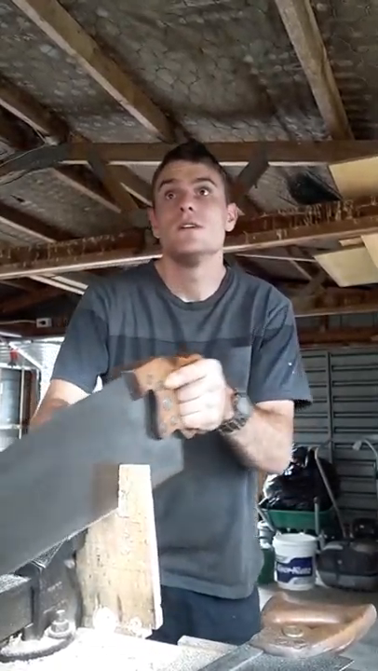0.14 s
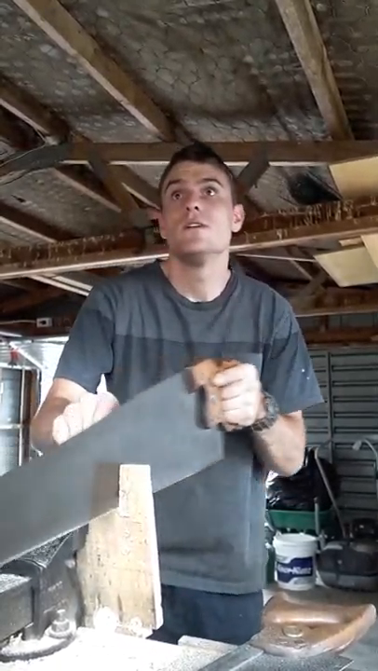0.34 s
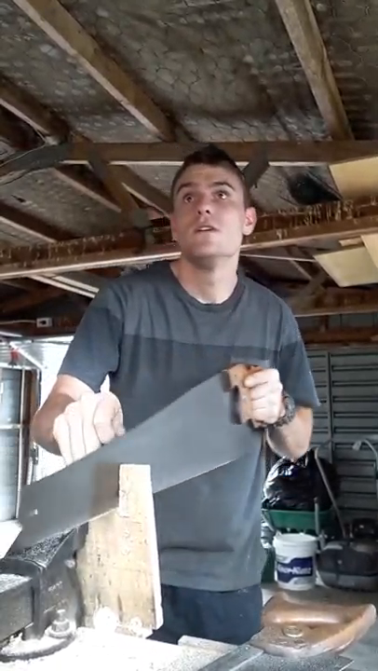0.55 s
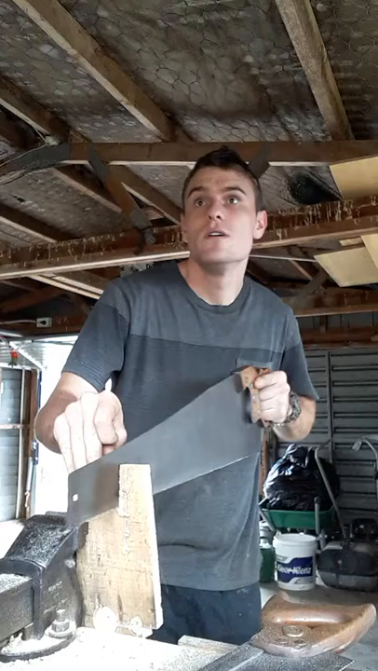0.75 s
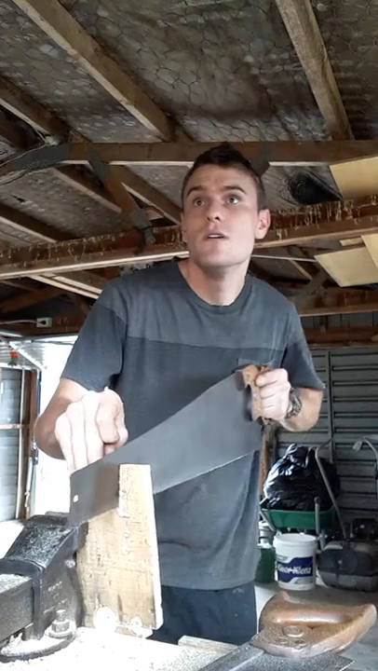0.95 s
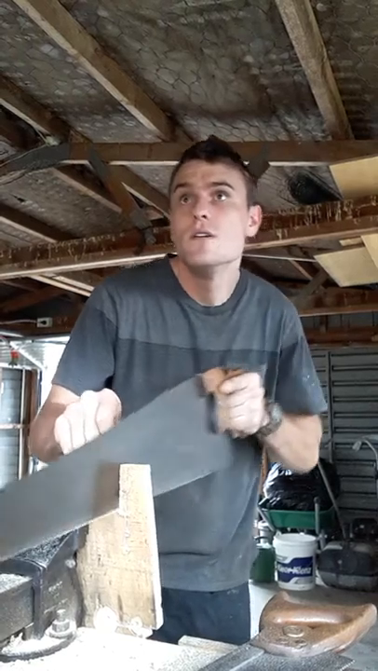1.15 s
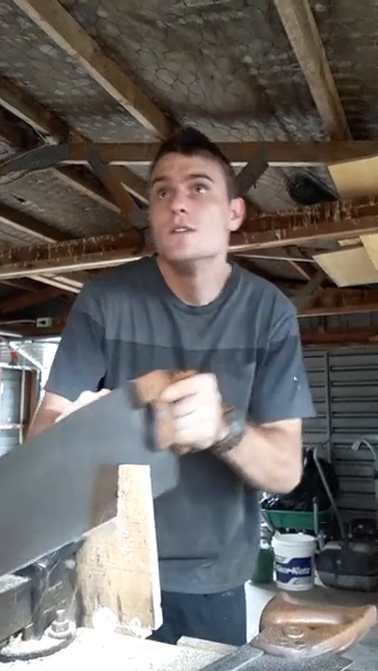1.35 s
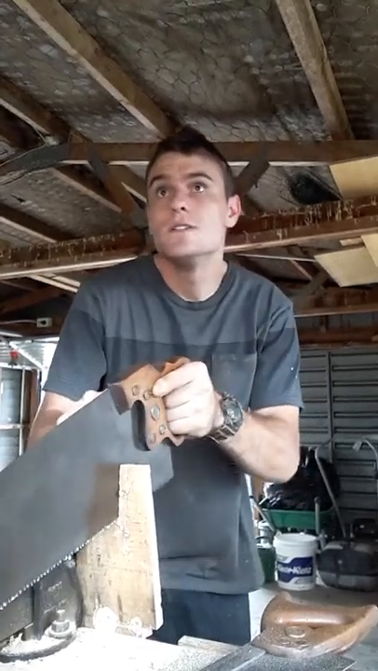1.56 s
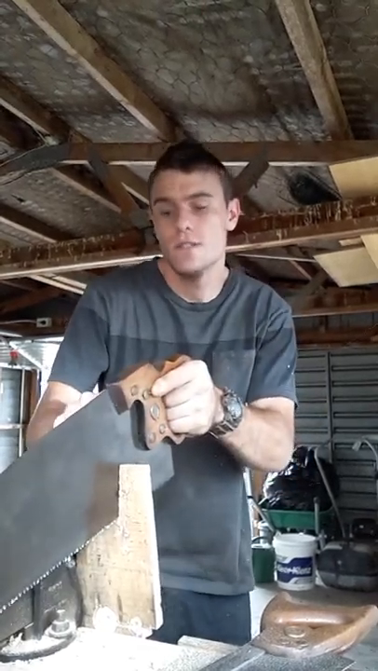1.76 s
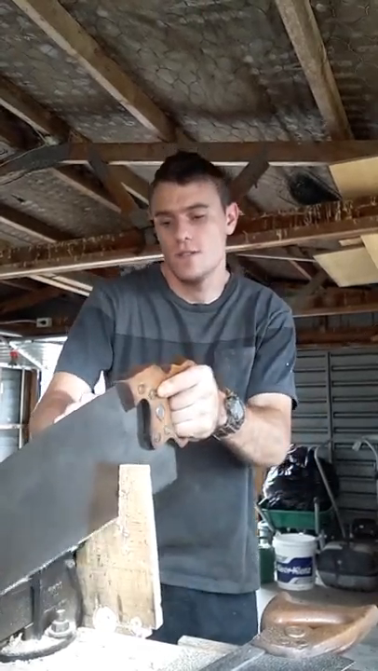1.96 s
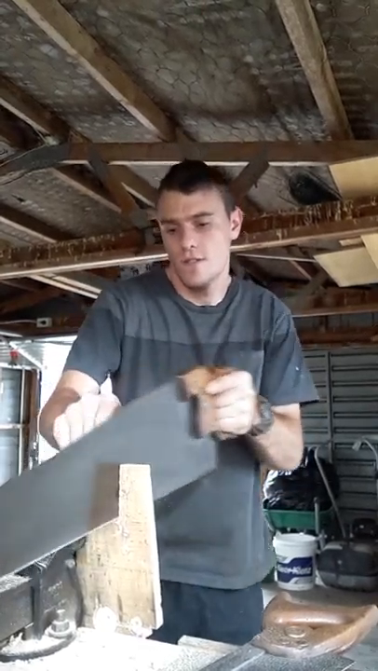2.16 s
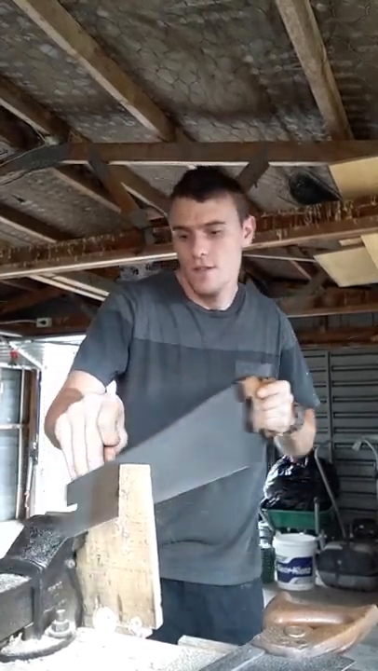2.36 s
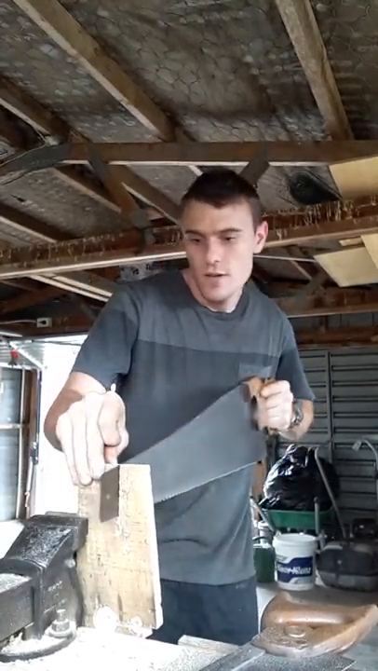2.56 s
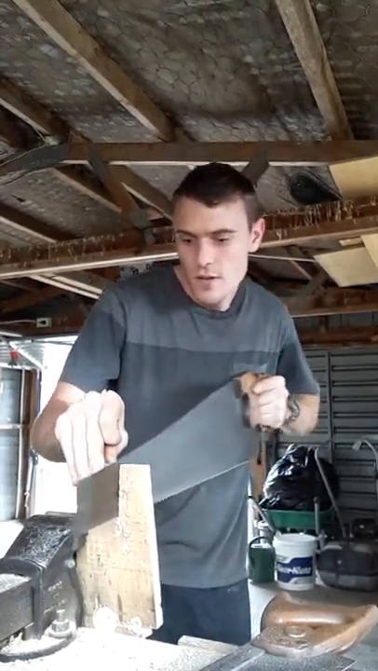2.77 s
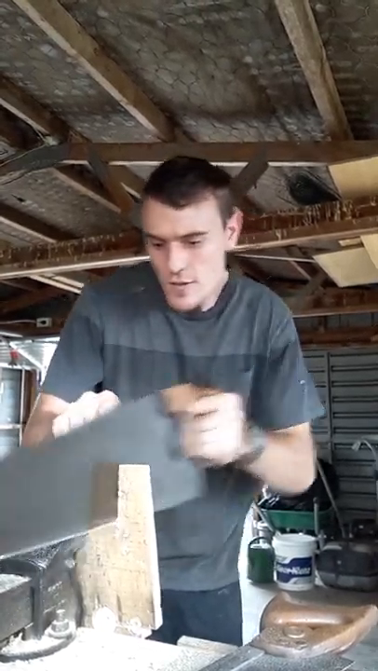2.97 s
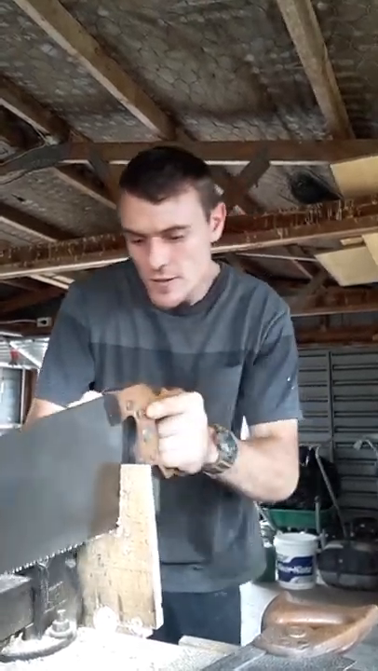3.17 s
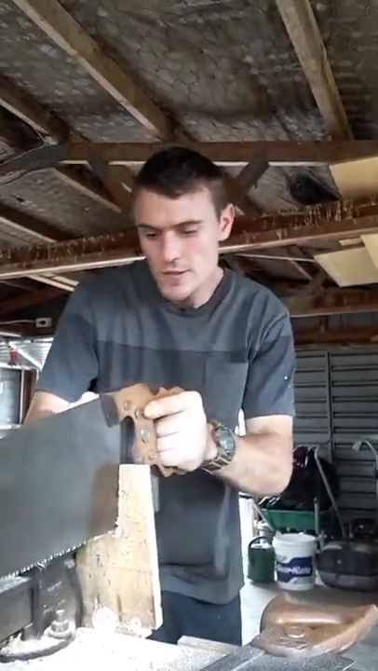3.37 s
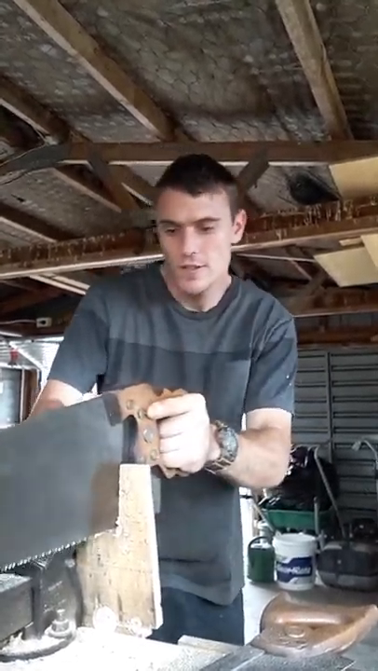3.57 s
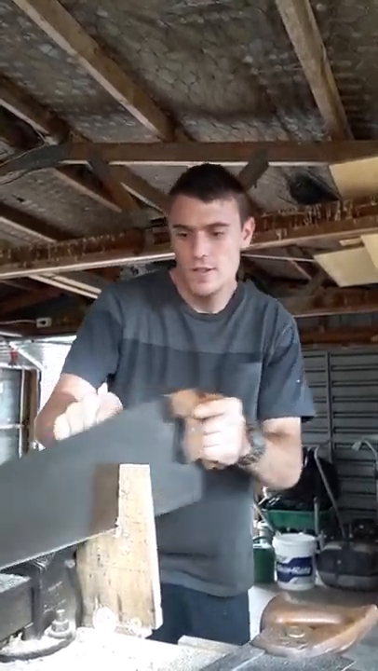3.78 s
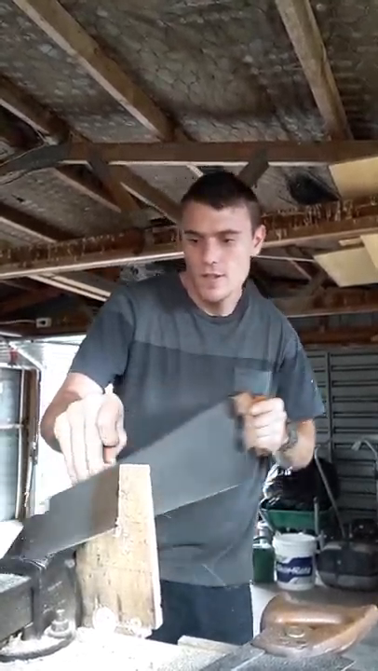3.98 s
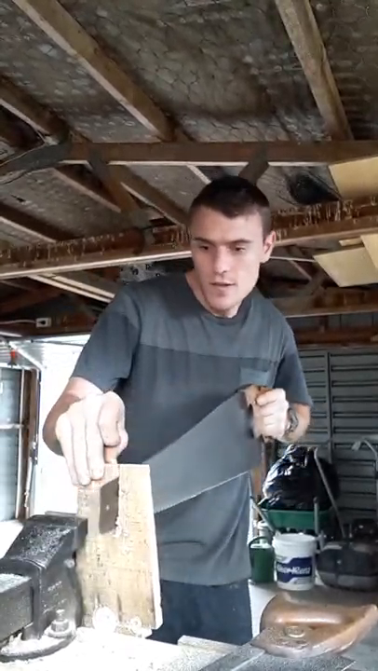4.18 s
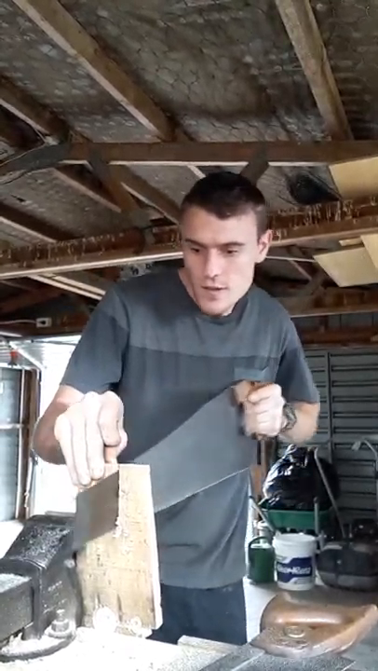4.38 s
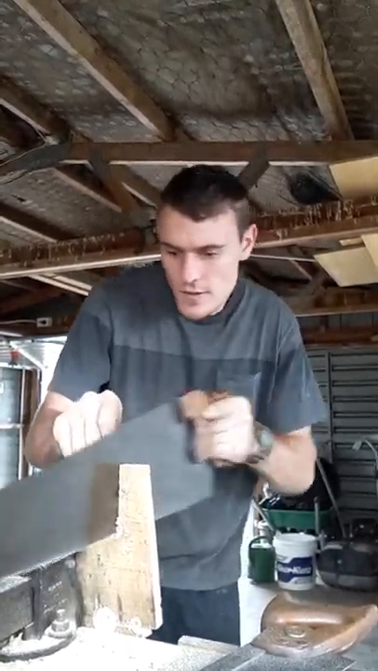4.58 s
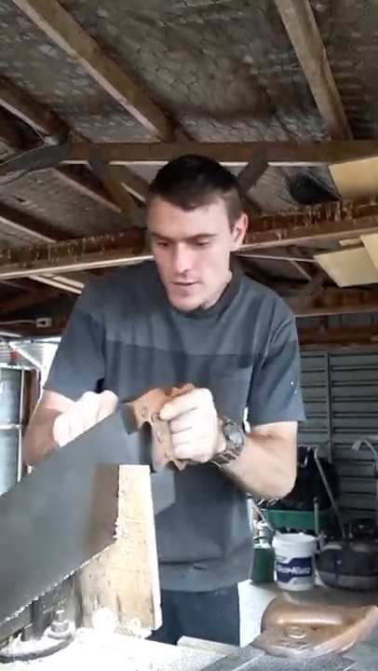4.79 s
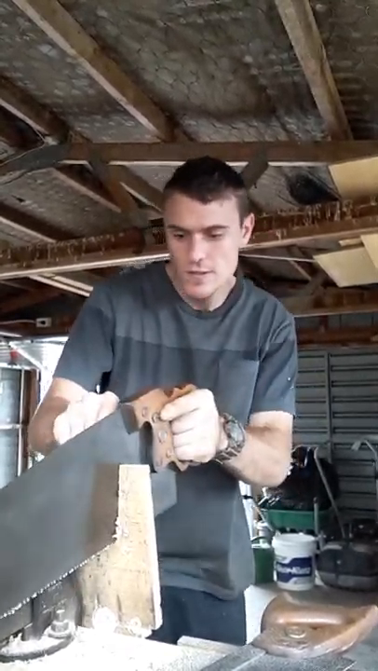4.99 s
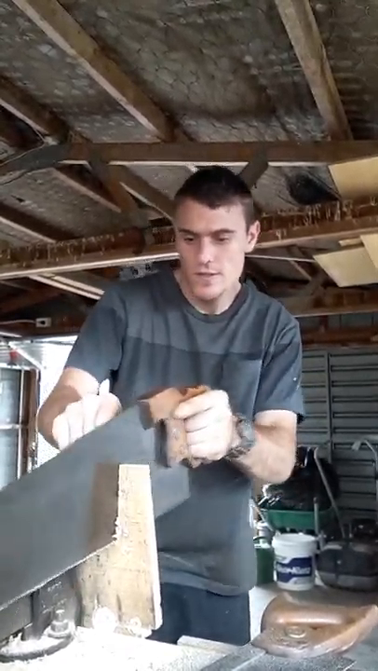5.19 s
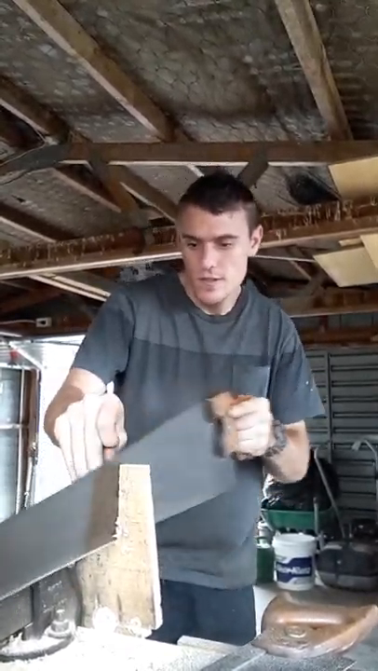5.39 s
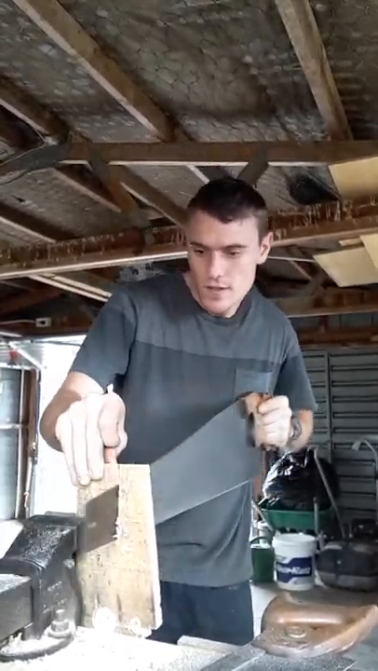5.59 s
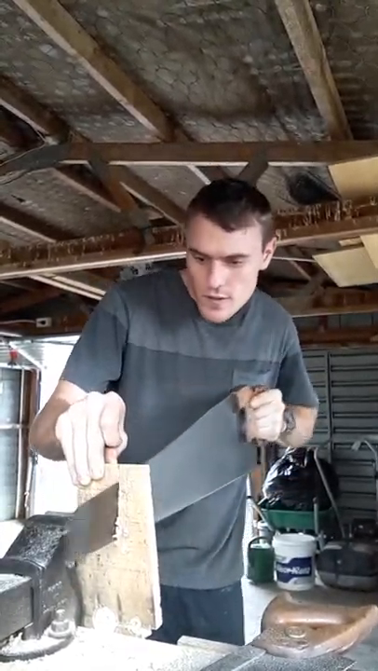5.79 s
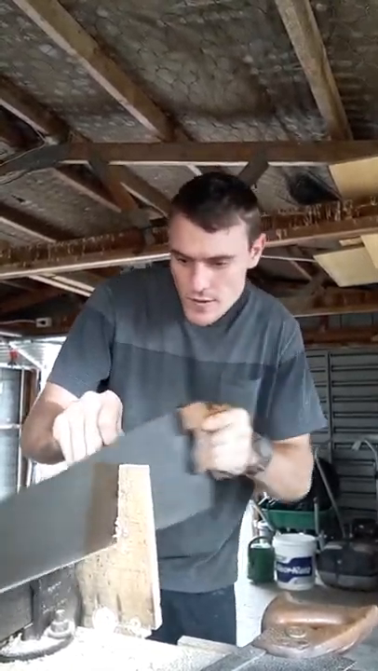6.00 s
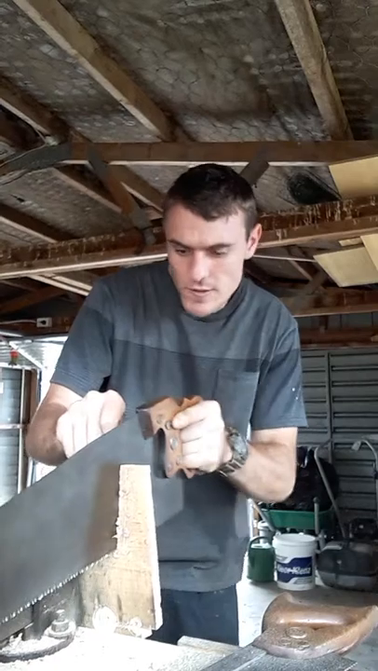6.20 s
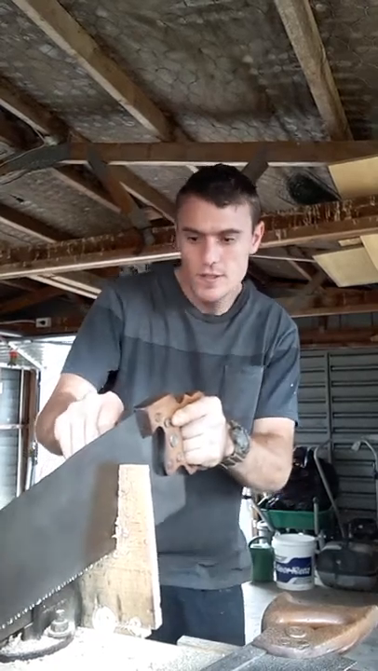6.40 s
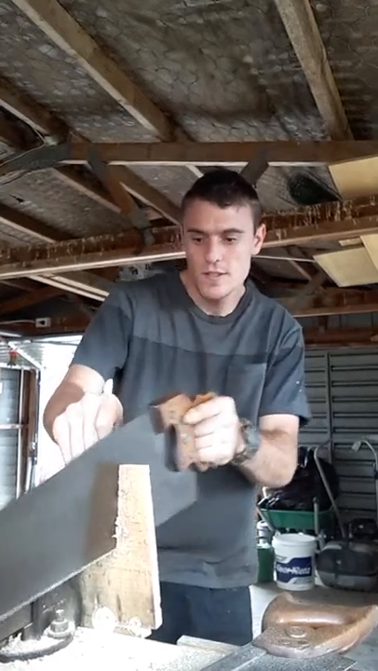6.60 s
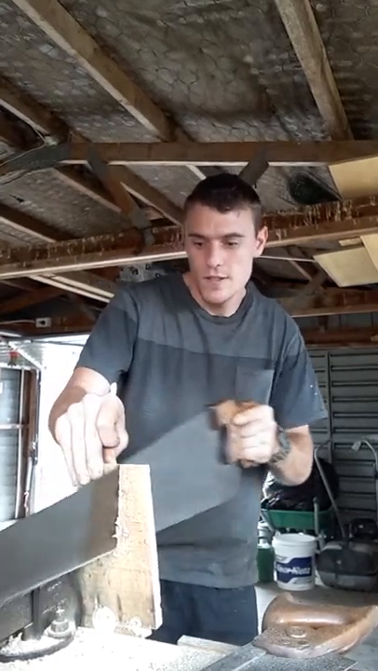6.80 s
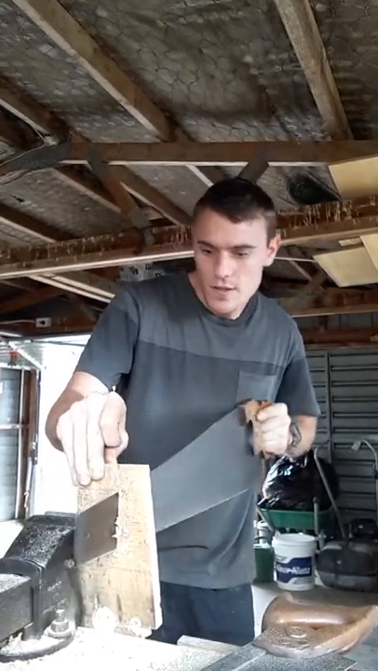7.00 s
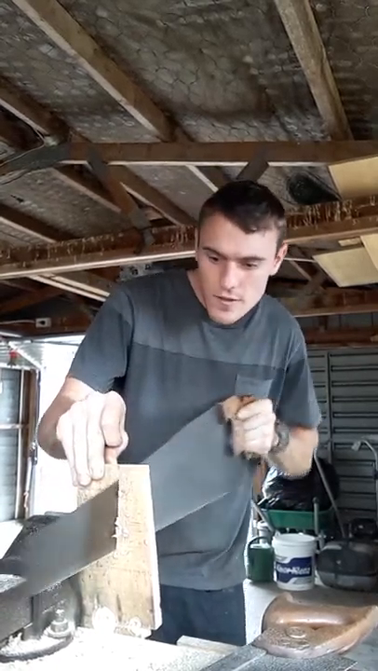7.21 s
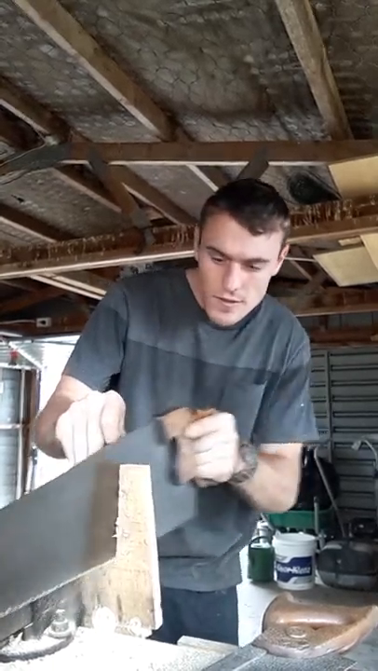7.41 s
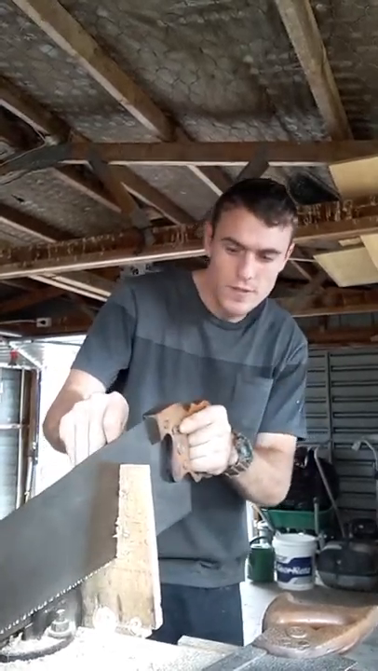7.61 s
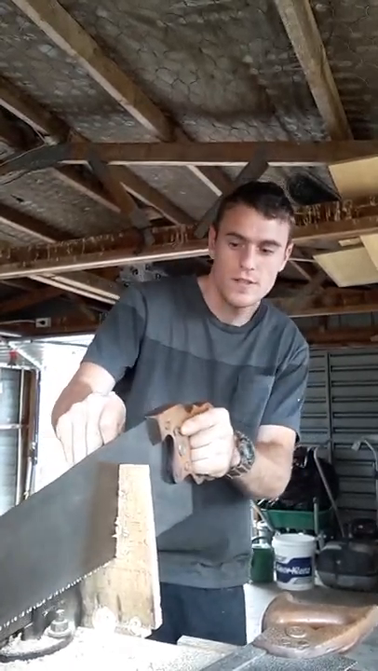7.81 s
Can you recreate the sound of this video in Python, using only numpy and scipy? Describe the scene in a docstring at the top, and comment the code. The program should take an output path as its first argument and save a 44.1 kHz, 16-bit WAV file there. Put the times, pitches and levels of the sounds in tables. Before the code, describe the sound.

Close view of a large hand saw ripping an upright board in a vice. Pulls and pushes alternate steadily, coarse fibrous rasps with a bright steely hiss, strongest on the pushes. The board hums low and the bench rumbles. Splinters snap as teeth catch, and the slack blade knocks woodenly between strokes. A short, dull workshop echo; the last push stops and two knocks follow over faint air.

```python
"""A large hand saw rips a board upright in a vice, in a timber-roofed workshop: five pulls, five pushes, in turn.
The first pull starts at once: torn fibres rasp and ring the steel, the board sways, the bench rumbles.
Teeth snag from early on, noise bursts as splinters snap; from 1.6 s the slack blade knocks in the kerf near
the turns, a steel tick and decaying sines. The second push rasps loudest; the board's twist flares at 6.9 s.
After the last push, near 7.5 s, two more knocks sound over faint air noise."""
import sys
import numpy as np
from scipy import signal
from scipy.fft import rfft, irfft, next_fast_len
from scipy.io import wavfile
from scipy.ndimage import uniform_filter1d

SR = 44100
rng = np.random.default_rng(int(sys.argv[2]) if len(sys.argv) > 2 else 0)


def log_audio(samples):
    """Write samples as a 16-bit WAV file to the path given in sys.argv[1]."""
    # one column per channel
    frames = np.atleast_2d(samples).T
    # limit to full scale, then quantise
    limited = np.clip(frames, -1, 1)
    pcm = np.round(limited * 32767).astype(np.int16)
    wavfile.write(sys.argv[1], SR, pcm)


N = 346185
T = np.arange(N) / SR


def from_db(db):
    """Decibels to gain."""
    return 10 ** (np.asarray(db) / 20)


def rms_one(x):
    """Scale to unit power."""
    return x / np.sqrt(np.mean(x ** 2) + 1e-20)


def steady(x, window_s):
    """Hold the power at 1 over spans longer than the window."""
    size = max(int(window_s * SR), 2)
    power = np.abs(uniform_filter1d(uniform_filter1d(x ** 2, size), size))
    return x / np.sqrt(power + 1e-12)


def colour(x, points):
    """Causal minimum-phase filter with the given (Hz, dB) spectrum, falling steeply past its ends."""
    size = next_fast_len(len(x) + SR // 4, real=True) * 2
    octave = np.log2(np.maximum(np.fft.rfftfreq(size, 1 / SR), 1))
    hz, db = np.transpose(points)
    beyond_octaves = np.abs(octave - np.clip(octave, np.log2(hz[0]), np.log2(hz[-1])))
    gain = from_db(np.interp(octave, np.log2(hz), db) - np.minimum(40 * beyond_octaves, 80))
    # folding the cepstrum onto positive time gives minimum phase
    cepstrum = irfft(np.log(gain))[:size // 2]
    cepstrum[1:] *= 2
    response = np.exp(rfft(cepstrum, size))
    return irfft(rfft(x, size) * response)[:len(x)]


def resonate(x, modes):
    """Parallel two-pole resonances of (Hz, width in Hz, gain at the top in dB)."""
    out = 0
    for hz, width_hz, db in modes:
        r = np.exp(-np.pi * width_hz / SR)
        poles = [1, -2 * r * np.cos(2 * np.pi * hz / SR), r * r]
        out = out + from_db(db) * (1 - r * r) / 2 * signal.lfilter([1, 0, -1], poles, x)
    return out


def ring(clicks, hz, t60_s):
    """A unit click sets a decaying sine of height 1 ringing."""
    r, w = from_db(-60 / (t60_s * SR)), 2 * np.pi * hz / SR
    return signal.lfilter([0, np.sin(w)], [1, -2 * r * np.cos(w), r * r], clicks + 1e-18)


def clicks_at(times_s, db):
    """One single-sample click for each time."""
    out = np.zeros(N)
    out[(np.asarray(times_s) * SR).astype(int)] = from_db(db)
    return out


def decay(clicks, decay_s):
    """Each click becomes an exponentially dying pulse."""
    return signal.lfilter([1], [1, -np.exp(-1 / (decay_s * SR))], clicks + 1e-18)


def crack(clicks, decay_s):
    """Each click becomes a quickly dying burst of noise."""
    return decay(clicks, decay_s) * rng.standard_normal(N)


def drift(per_s):
    """A random wander: straight lines between normal draws, per_s draws a second."""
    knots = rng.standard_normal(4000)
    return np.interp(T * per_s, np.arange(len(knots)), knots)


def swells(rows, width_s):
    """A bell-shaped rise in dB around each (s, dB)."""
    return sum(db * np.exp(-((T - s) / width_s) ** 2) for s, db in rows)


# Strokes, pull and push in turn. Each row: start in s, attack in s, arm lets up in s, release in s,
# wood rasp, steel hiss, board sway and bench rumble as relative levels in dB, board pitch in Hz,
# kerf resonance, blade ring and blade song near 4 kHz in dB.
STROKES = [(.027, 0.074, .83, 0.1, -19.5, -26, -17.5, -18, 271.6, 7, -4, -2.5),
           (.952, 0.038, 1.46, 0.034, -17, -22, -16, -15.5, 263.2, 1, -10, 1.5),
           (1.973, 0.059, 2.538, 0.033, -17, -23.5, -15.5, -16.5, 267.2, 6.5, 6.5, 1.5),
           (2.712, 0.065, 3.151, 0.053, -13.5, -15, -15, -14, 268.7, 7.5, 7.5, 2),
           (3.617, 0.071, 4.181, 0.037, -17.5, -21.5, -14.5, -18, 267.4, 2.5, 7, -1),
           (4.305, 0.063, 4.79, .046, -15.5, -16.5, -11.5, -14, 264, 1, 5, 0.5),
           (5.145, 0.067, 5.682, 0.031, -20.2, -21.2, -17, -22, 268.6, 0, 10.5, -2.5),
           (5.75, 0.057, 6.147, 0.06, -15.5, -15, -10.5, -16, 257.1, 1.5, 6.5, -4.5),
           (6.576, 0.079, 7.048, .028, -21.5, -24, -14.5, -22, 261.3, -2, 6.5, -10),
           (7.096, 0.05, 7.502, 0.032, -18, -18.5, -11.5, -17, 254.4, 3, 6, -4)]
COAST_S = .15   # the teeth run on this long after the arm lets up
TOOTH_RATE_SCALE = 85


def arm():
    """Tooth rate, push (1) or pull (0), and the levels, pitch and resonance gains of the stroke under way."""
    start_s, _, let_up_s, _, *settings = np.transpose(STROKES)
    stroke = np.maximum(np.searchsorted(start_s, T) - 1, 0)
    length_s = (let_up_s + COAST_S - start_s)[stroke]
    progress = np.clip((T - start_s[stroke]) / length_s, 0, 1)
    # fastest mid-stroke, never quite still
    teeth_per_s = TOOTH_RATE_SCALE / length_s * (.3 + np.sin(np.pi * progress))
    push = 1. * (stroke % 2)
    controls = [teeth_per_s, push] + [column[stroke] for column in settings]
    return [uniform_filter1d(control, size=800) for control in controls]


SLACK_DB, COAST_DB_PER_S = -31, -84.5


def stroke_effort(start_s, attack_s, let_up_s, release_s, drop_db):
    """Effort in dB rises from slack, holds, drops as the arm lets up, then dies as the blade coasts."""
    attack_db = SLACK_DB * np.exp(np.minimum((start_s - T) / attack_s, 2))
    release_db = drop_db * (1 + np.tanh((T - let_up_s) / (2 * release_s))) / 2
    coast_db = COAST_DB_PER_S * np.maximum(T - let_up_s - release_s, 0)
    return attack_db + release_db + coast_db


IDLE_DB = -47   # blade resting in the kerf, before a layer's share
MID_PUSH_S = 0.12   # width of the mid-push swell, centre to 1/e in dB


def effort(share, pull_drop_db, push_drop_db, pull_lead_s, push_lead_s, mid_push_db):
    """Effort of all strokes in dB, as felt by a layer that takes a share of its swing and may fade early or late."""
    gain = from_db(IDLE_DB)
    for k, (start_s, attack_s, let_up_s, release_s, *_) in enumerate(STROKES):
        is_push = k % 2
        lead_s = push_lead_s if is_push else pull_lead_s
        drop_db = push_drop_db if is_push else pull_drop_db
        gain = gain + from_db(stroke_effort(start_s, attack_s, let_up_s - lead_s, release_s, drop_db))
    mid_pushes = [((start_s + let_up_s) / 2, mid_push_db) for start_s, _, let_up_s, *_ in STROKES[1::2]]
    return share * 20 * np.log10(gain) + swells(mid_pushes, MID_PUSH_S)


def tooth_force(teeth_per_s, uneven_db, tear_s, rub):
    """Every tooth enters the wood with its own strength and lets go; the blade's sides rub throughout."""
    travel_teeth = np.cumsum(teeth_per_s) / SR
    chance = rng.standard_normal((4000, 2))
    tooth = np.arange(min(int(travel_teeth[-1]), len(chance)))
    times_s = np.interp(tooth + .15 * chance[tooth, 0], travel_teeth, T)
    bites = clicks_at(times_s, uneven_db * np.minimum(chance[tooth, 1], 2))
    return steady(rub + decay(bites, tear_s), window_s=0.083)


def fibres(force, grain_db):
    """Fibres break as dense tiny clicks of uneven size, as hard as the teeth press."""
    sizes = from_db(grain_db * rng.standard_normal(N))
    return force * rms_one(rng.standard_normal(N) * sizes)


def patchy(x, patchy_db, per_s):
    """Each clump of fibres has its own pitch: half-octave bands swell independently."""
    size = next_fast_len(N, real=True)
    octave = np.log2(np.maximum(np.fft.rfftfreq(size, 1 / SR), 1))
    spectrum = rfft(x, size)
    centres = np.log2(400) + np.arange(11) / 2
    out = 0
    for share in np.eye(len(centres)):
        band = irfft(spectrum * np.interp(octave, centres, share), size)[:N]
        out = out + band * from_db(patchy_db * drift(per_s))
    return out


# Spectrum of torn wood. Each row: frequency in Hz, relative level in dB.
RASP_SPECTRUM = [(280, -12.5), (330, 12), (490, 7), (640, 2), (900, -2.5), (1400, 0), (1900, -3),
                 (2500, -6.5), (3300, -12.5), (4600, -12), (7000, -17.5)]
# Resonances of board, kerf slot and broad blade. Each row: frequency in Hz, width in Hz, gain in dB.
WOOD_MODES = [(545, 20, 7.5), (785, 40, 6.5), (1485, 20, -16)]
KERF_MODES = [(1022, 100, -0.5), (1165, 125, -3), (2813, 24, -8.5)]
BLADE_MODES = [(1722, 51, 4), (2157, 45, -0.5), (2426, 13, -5.5)]


def rasp(force, level_db, kerf_db, blade_db):
    """Torn fibres ring the board, the slot of the kerf and the broad blade."""
    torn = patchy(colour(fibres(force, grain_db=3.5), RASP_SPECTRUM), patchy_db=3.5, per_s=70)
    for modes, db in ((WOOD_MODES, 0), (KERF_MODES, kerf_db), (BLADE_MODES, blade_db)):
        torn += from_db(db) * resonate(fibres(force, grain_db=2.5), modes)
    return from_db(level_db + 0.08) * steady(torn, window_s=0.054)


# Spectrum of the steel hiss. Each row: frequency in Hz, relative level in dB.
HISS_SPECTRUM = [(2400, -27.5), (3200, -15.5), (5000, -23.5), (6300, -15.5), (7300, -7.5), (7900, -1.5),
                 (8300, 2), (8800, -3.5), (9500, -10), (10500, -16.5), (12200, -21.5), (14000, -19.5),
                 (16000, -25.5)]
# Ring of the steel teeth, then blade song near 4 kHz. Each row: frequency in Hz, width in Hz, gain in dB.
STEEL_MODES = [(4910, 52, -10), (5780, 110, -11), (6910, 160, -12), (8250, 31, -16), (8520, 22, 5)]
SONG_MODES = [(4063, 49, 3), (4180, 100, -7)]


def hiss(force, hiss_db, song_db):
    """The steel teeth ring near 8 kHz and sing an octave lower; a light touch loses the top."""
    steel = patchy(colour(fibres(force, grain_db=1.5), HISS_SPECTRUM), patchy_db=3.0, per_s=70)
    steel += resonate(fibres(force, grain_db=2.5), STEEL_MODES)
    steel += from_db(song_db) * resonate(fibres(force, grain_db=7.5), SONG_MODES)
    steel = steady(steel, window_s=0.18)
    dull = signal.sosfilt(signal.butter(8, 9300, "low", fs=SR, output="sos"), steel)
    top = signal.sosfilt(signal.butter(8, 9300, "high", fs=SR, output="sos"), steel)
    top_loss_db = 0.6 * np.minimum(hiss_db + 35.5, 0)
    return from_db(hiss_db - 2.5) * (dull + top * from_db(top_loss_db))


# Blade knocks in the kerf. Each row: time in s, relative strength in dB, steel tick relative to the wood in dB.
KNOCKS = [(1.61, -41, -17), (1.76, -34, -25.5), (1.916, -32, -15), (3.296, -33.5, -23), (3.475, -35, -23),
          (3.567, -37, -23), (4.982, -39, -21), (5.039, -31.5, -18), (5.094, -34, -23),
          (5.145, -32.5, -10.5), (6.349, -41, -19), (6.448, -31.5, -13), (6.634, -28, -10),
          (7.666, -37, -14.5), (7.753, -31.5, -14)]
# Ring of the knocked board. Each row: frequency in Hz, relative level in dB.
KNOCK_MODES = [(431, 14), (558, 15.5), (665, 14), (960, 14), (1060, 11), (1228, 13.5), (1350, 8),
               (1580, 6.5), (2160, 4)]
# Spectrum of the steel tick. Each row: frequency in Hz, relative level in dB.
TICK_SPECTRUM = [(600, 22), (1500, 12), (3000, 15), (4700, 8), (6000, 9), (7400, 3), (8400, 14),
                 (10200, -14), (12000, -56)]
KNOCK_T60_AT_900_HZ_S = .05


def knocks(wood_lag_s):
    """A steel tick, then the hollow ring of the board as the blade slaps the kerf wall; higher modes die sooner."""
    times_s, db, tick_db = np.transpose(KNOCKS)
    strength_db = rng.standard_normal((len(times_s), len(KNOCK_MODES)))
    wood = 0
    for k, (hz, mode_db) in enumerate(KNOCK_MODES):
        blows = clicks_at(times_s + wood_lag_s, db + mode_db + strength_db[:, k])
        t60_s = KNOCK_T60_AT_900_HZ_S * np.sqrt(900 / hz)
        wood += (-1) ** k * ring(blows, hz, t60_s)
    tick = colour(crack(clicks_at(times_s, db + tick_db), decay_s=.0015), TICK_SPECTRUM)
    tick = signal.sosfilt(signal.butter(8, 9800, fs=SR, output="sos"), tick)
    return from_db(-10.0) * wood + from_db(14.0) * tick


# A tooth snags and snaps a splinter. Each row: time in s, relative strength in dB.
SNAGS = [(0.123, -22), (.969, -34), (1.035, -16), (2.049, -20), (2.113, -26), (2.727, -31), (3.124, -36),
         (3.164, -24.5), (4.306, -36), (4.78, -15.5), (5.789, -26), (5.811, -21), (7.118, -31)]
# Spectrum of the snap. Each row: frequency in Hz, relative level in dB.
SNAP_SPECTRUM = [(300, 14.5), (1000, 10), (3000, 0), (4500, -3.5), (6000, -3), (8300, 4), (11000, -15),
                 (16000, -50)]


def snags():
    """Splinters snap with a short bright crack."""
    times_s, db = np.transpose(SNAGS)
    return from_db(4.0) * colour(crack(clicks_at(times_s, db), decay_s=0.0074), SNAP_SPECTRUM)


def chatter(hz, wander, flutter_db):
    """A mode kept swinging by the teeth: one tone, its pitch and strength unsteady."""
    phase = 2 * np.pi * np.cumsum(hz * (1 + wander * drift(per_s=35))) / SR
    return rms_one(np.sin(phase) * from_db(flutter_db * drift(per_s=45)))


# The board shudders in the vice. Each row: time in s, swell of the sway in dB.
SHUDDERS = [(.27, 10), (1.26, 10.5), (2.8, 18), (3.95, 6), (4.1, 4), (4.41, 10.5), (5.82, 7.5), (6.05, 3),
            (7.19, 8.5)]
# The board jolted in the vice. Each row: frequency in Hz, width in Hz, gain in dB.
JOLTED_BOARD_MODE = [(272, 50, 0)]
SHUDDER_S = 0.036
TWIST_HZ, TWIST_DB = 409.4, -14.5   # level relative to the unswelled sway


def board(force, level_db, board_hz):
    """The board's free end sways, mostly lower as the kerf deepens, and twists at a higher pitch."""
    sway = from_db(swells(SHUDDERS, SHUDDER_S)) * chatter(board_hz, wander=0.0118, flutter_db=4.5)
    flare_db = swells([(6.88, 13.8)], width_s=0.097)
    twist = from_db(TWIST_DB + flare_db) * chatter(TWIST_HZ, wander=0.0292, flutter_db=-1.0)
    jolts = resonate(resonate(fibres(force, grain_db=3.0), JOLTED_BOARD_MODE), JOLTED_BOARD_MODE)
    return from_db(level_db) * (sway + twist + from_db(-8.0) * rms_one(jolts))


# Spectra of the bench rumble. Each row: frequency in Hz, relative level in dB.
BENCH_PULL_SPECTRUM = [(32, -33), (48, -7), (62, 0), (80, -0.5), (100, -12), (125, -4.5), (160, 0),
                       (195, -14), (260, -5)]
BENCH_PUSH_SPECTRUM = [(32, -28), (48, -12), (62, -6.5), (80, -10), (100, -2), (120, -3), (160, -0.5),
                       (195, -10), (260, -5)]
# The blade binds and jolts the bench. Each row: time in s, swell of the rumble in dB.
JOLTS = [(1.11, 9), (1.43, 7), (3.135, 8), (4.68, 3.5), (6.12, 8), (7.455, 4)]
JOLT_S = 0.057


def bench(force, level_db, push):
    """The drag of the saw shakes vice and bench, deeper on the pull."""
    drag = fibres(force, grain_db=2.0)
    pushed = push * colour(drag, BENCH_PUSH_SPECTRUM)
    pulled = (1 - push) * colour(drag, BENCH_PULL_SPECTRUM)
    return from_db(level_db + swells(JOLTS, JOLT_S)) * steady(pushed + pulled, window_s=0.16)


WORKSHOP_T60_S = 0.18


def workshop(x, wet_db, wall_hz):
    """A short, dull, diffuse echo off rafters and clutter: decaying noise after a 4 ms gap."""
    t = T[:SR // 2]
    tail = rng.standard_normal(len(t)) * from_db(-60 * t / WORKSHOP_T60_S) * (t > .004)
    tail /= np.linalg.norm(tail)
    tail = signal.sosfilt(signal.butter(1, min(wall_hz, SR / 3), fs=SR, output="sos"), tail)
    return x + from_db(wet_db) * signal.fftconvolve(x, tail)[:N]


# Spectrum of the air noise. Each row: frequency in Hz, relative level in dB.
AIR_SPECTRUM = [(20, 12), (160, 3), (1500, -14), (16000, -48)]


def air(level_db):
    """Steady noise, weighted to the lows."""
    return from_db(level_db) * rms_one(colour(rng.standard_normal(N), AIR_SPECTRUM))


# How each layer follows the effort. Each lists: share in dB per dB, drop ending a pull in dB, drop ending
# a push in dB, earlier fade on a pull in s, earlier fade on a push in s, swell mid-push in dB.
# Drops act before the share.
RASP_FOLLOWS = (1.0, -29.5, -18, .0, .0, 1)
HISS_FOLLOWS = (1.0945, -27.5, -23.5, -0.01, 0.0166, 1.5)
SWAY_FOLLOWS = (1.0, -22.5, -20.5, -0.01, 0.02, -2.5)
RUMBLE_FOLLOWS = (.86, -11, -16.5, 0.08, 0.03, -7)
BLADE_RING_DB_PER_DB = 0.41   # the broad blade rings out of the rasp only under effort


def scene():
    """The arm's effort sets the saw, board and bench levels; one tooth force drives all three."""
    teeth_per_s, push, rasp_db, hiss_db, sway_db, rumble_db, board_hz, kerf_db, blade_db, song_db = arm()
    force = tooth_force(teeth_per_s, uneven_db=4.0, tear_s=0.01, rub=0.96)
    bite_db = effort(*RASP_FOLLOWS)
    wood = rasp(force, rasp_db + bite_db, kerf_db, blade_db + BLADE_RING_DB_PER_DB * bite_db)
    steel = hiss(force, hiss_db + effort(*HISS_FOLLOWS), song_db)
    saw = wood + steel + knocks(wood_lag_s=0.00131) + snags()
    sway = board(force, sway_db + effort(*SWAY_FOLLOWS), board_hz)
    rumble = bench(force, rumble_db + effort(*RUMBLE_FOLLOWS), push)
    echoed = workshop(saw, wet_db=-12.0, wall_hz=6700)
    return (echoed + sway + rumble + air(level_db=-54.0))[None]


CEILING, CUTOFF_HZ = .93, 15800


def record(dry):
    """The highest peaks are rounded and the top is cut."""
    rounded = dry / (1 + (dry / CEILING) ** 8) ** (1 / 8)
    return signal.sosfilt(signal.ellip(12, .1, 80, CUTOFF_HZ, fs=SR, output="sos"), rounded)


dry = scene()
out = record(dry)
log_audio(out)
```